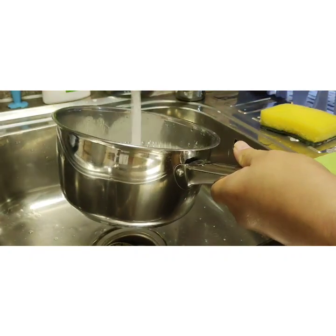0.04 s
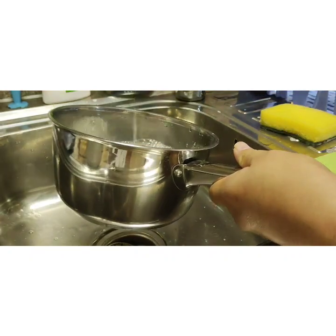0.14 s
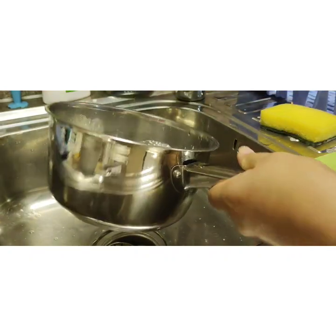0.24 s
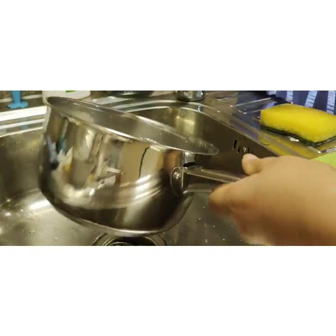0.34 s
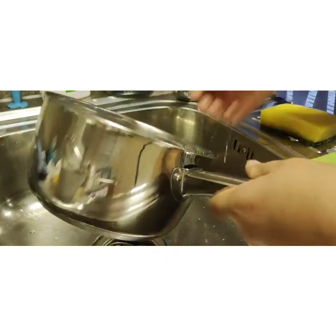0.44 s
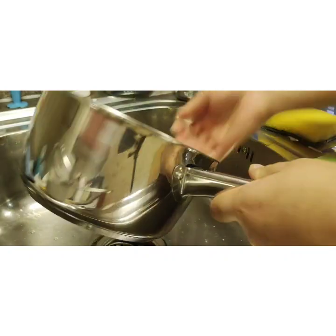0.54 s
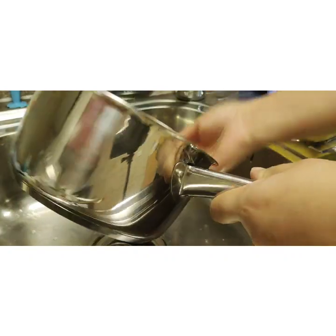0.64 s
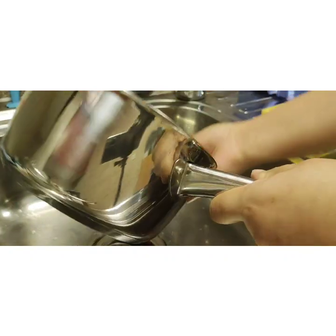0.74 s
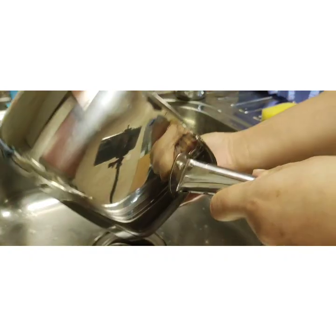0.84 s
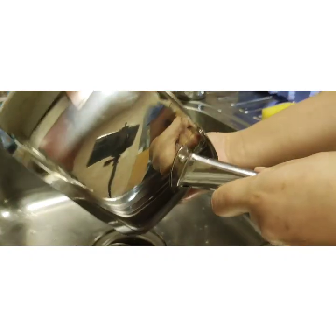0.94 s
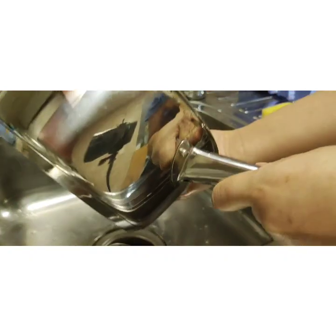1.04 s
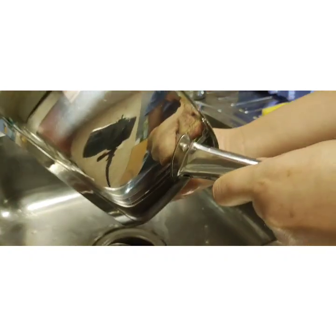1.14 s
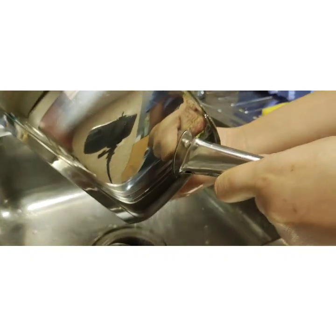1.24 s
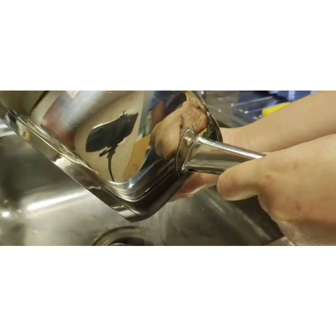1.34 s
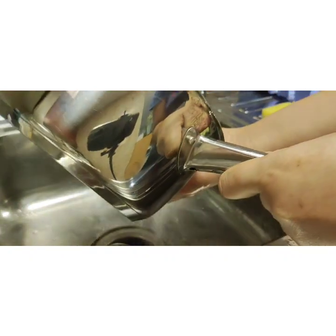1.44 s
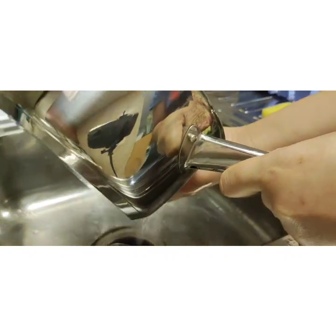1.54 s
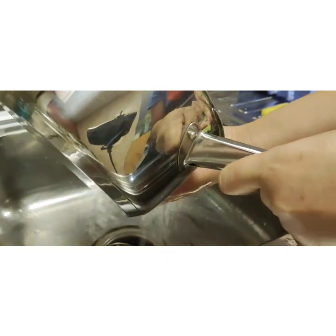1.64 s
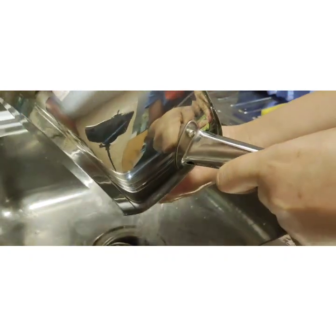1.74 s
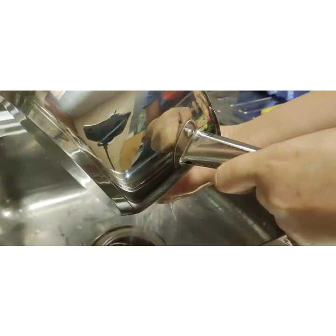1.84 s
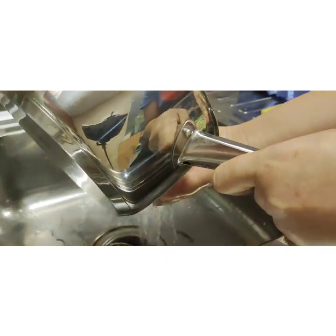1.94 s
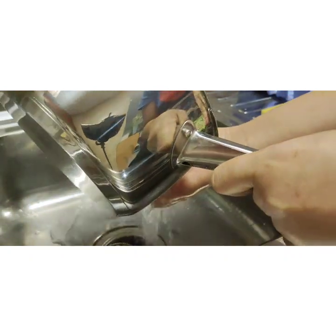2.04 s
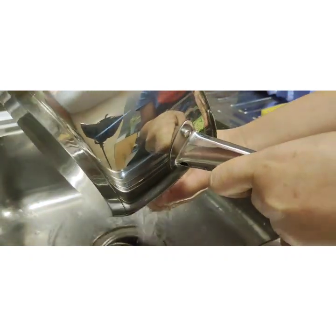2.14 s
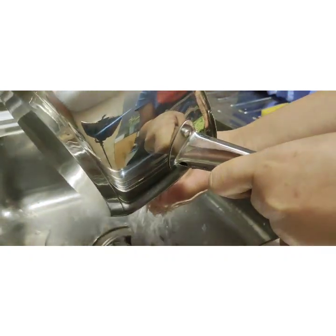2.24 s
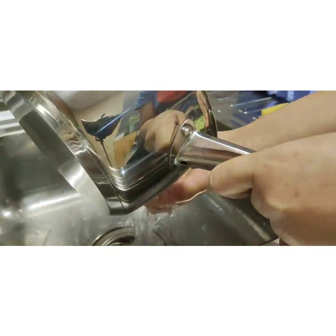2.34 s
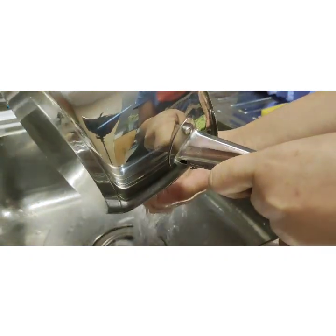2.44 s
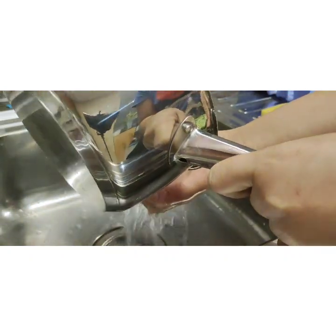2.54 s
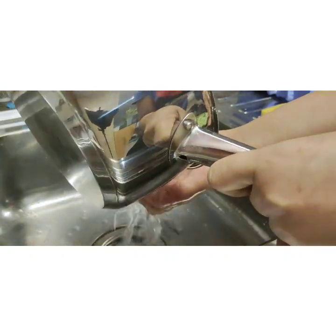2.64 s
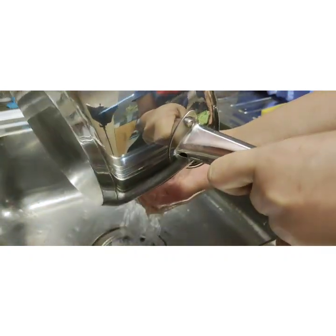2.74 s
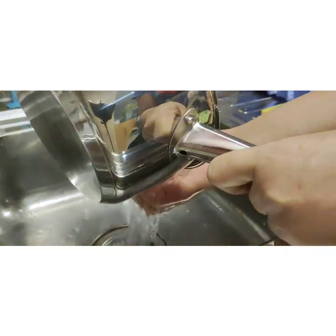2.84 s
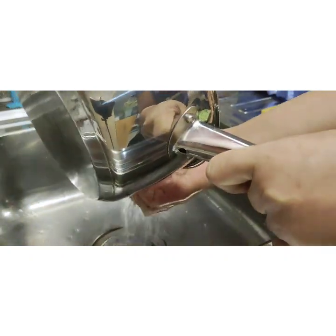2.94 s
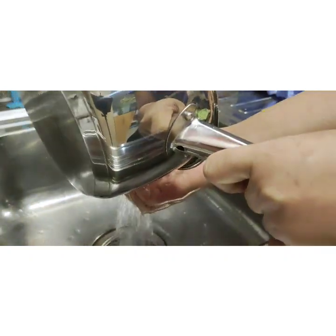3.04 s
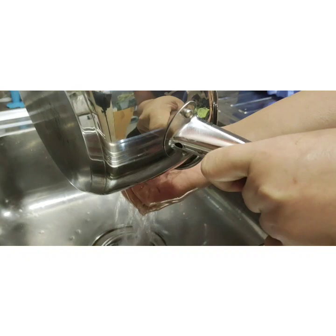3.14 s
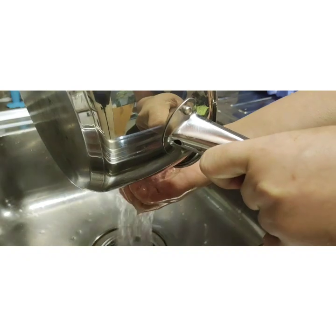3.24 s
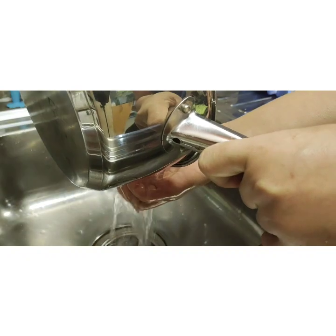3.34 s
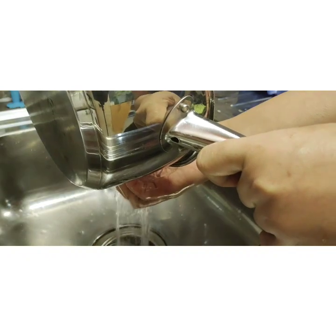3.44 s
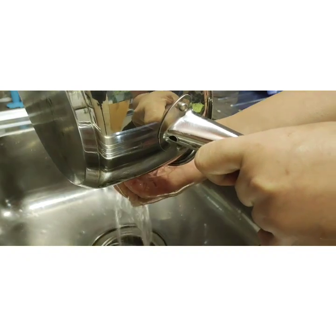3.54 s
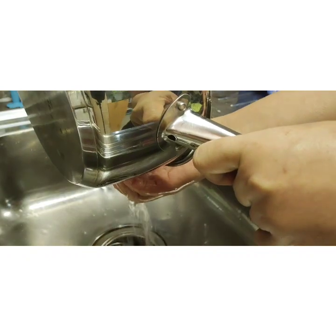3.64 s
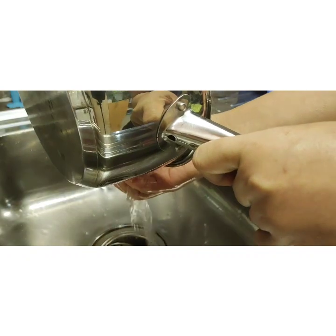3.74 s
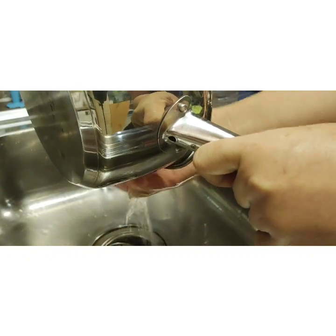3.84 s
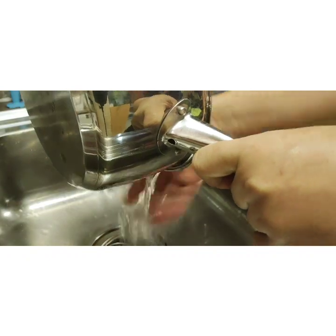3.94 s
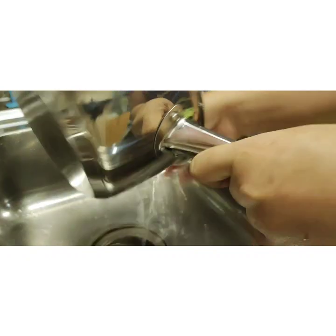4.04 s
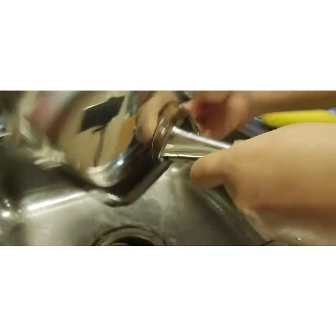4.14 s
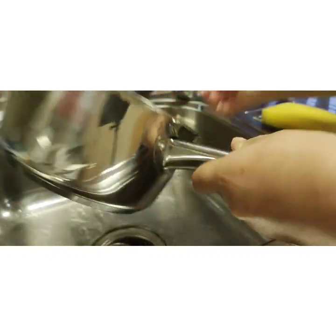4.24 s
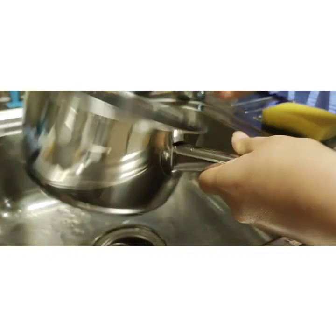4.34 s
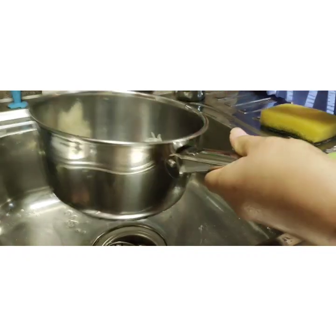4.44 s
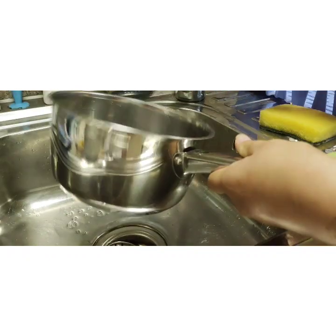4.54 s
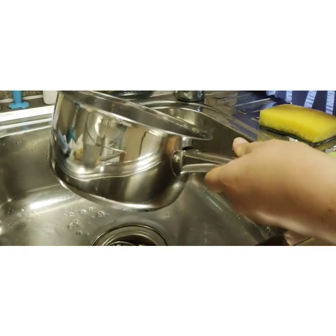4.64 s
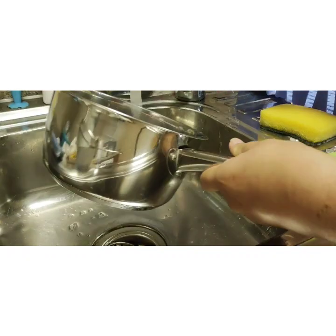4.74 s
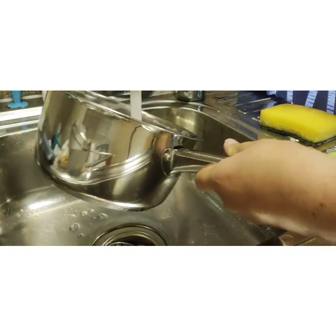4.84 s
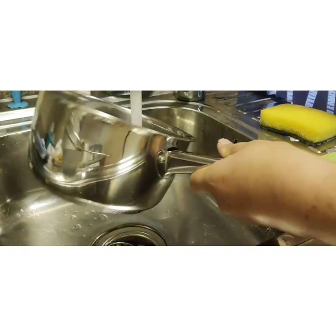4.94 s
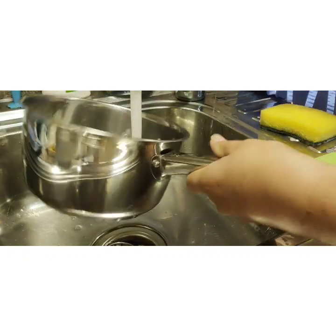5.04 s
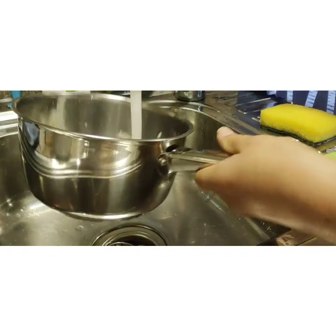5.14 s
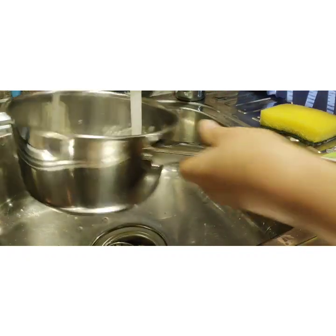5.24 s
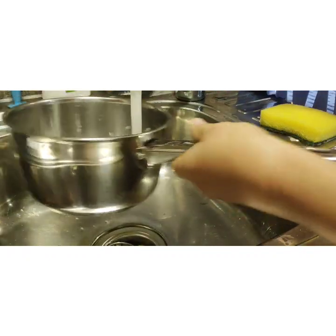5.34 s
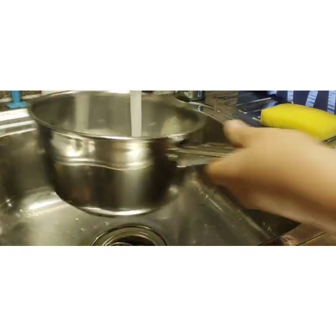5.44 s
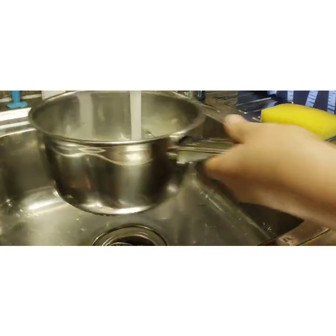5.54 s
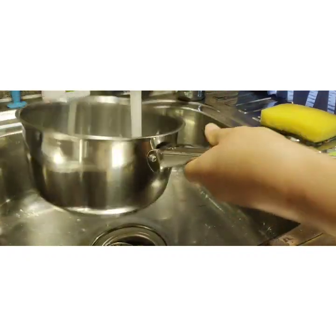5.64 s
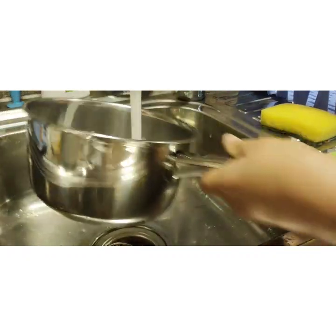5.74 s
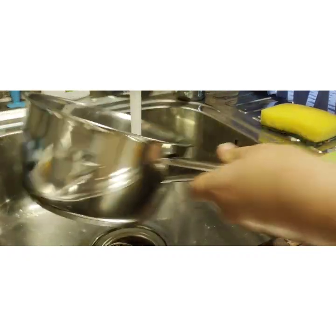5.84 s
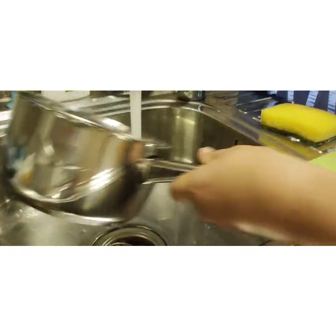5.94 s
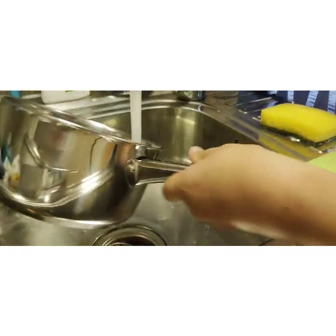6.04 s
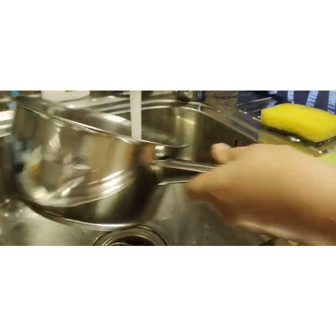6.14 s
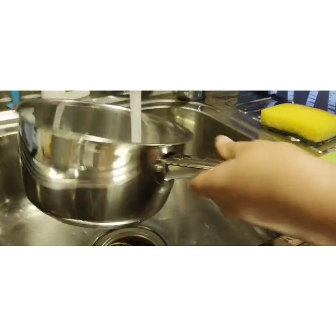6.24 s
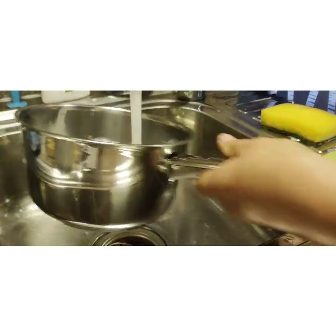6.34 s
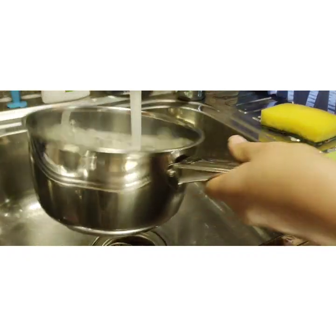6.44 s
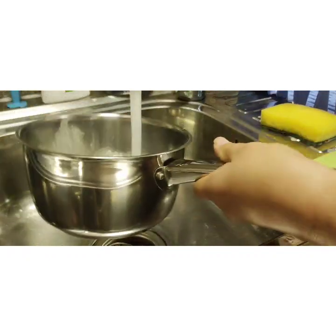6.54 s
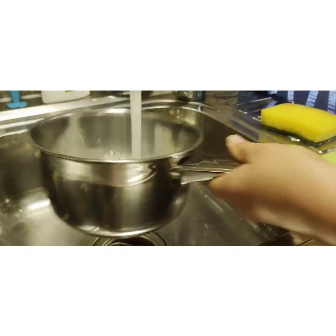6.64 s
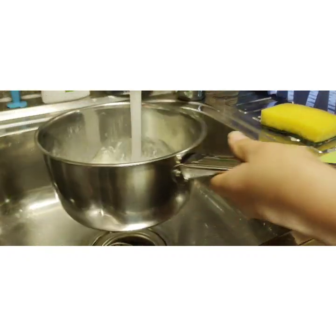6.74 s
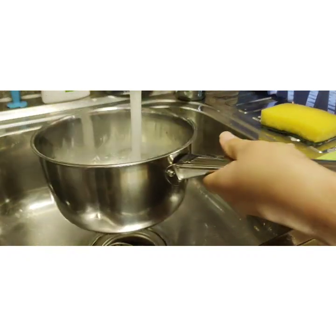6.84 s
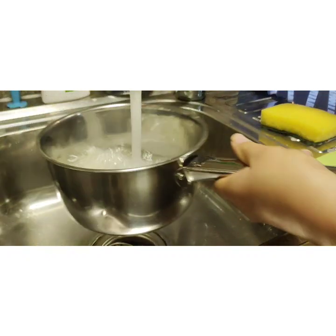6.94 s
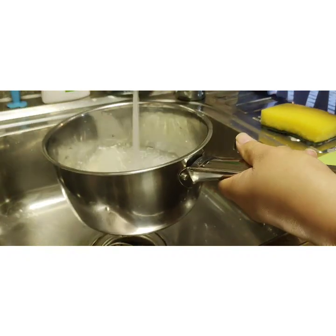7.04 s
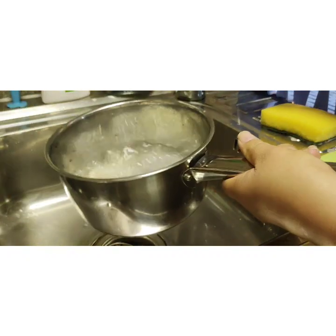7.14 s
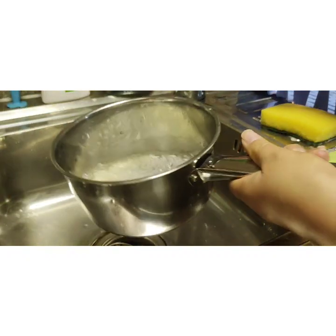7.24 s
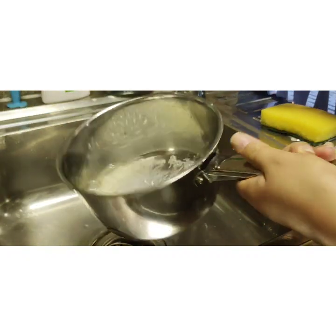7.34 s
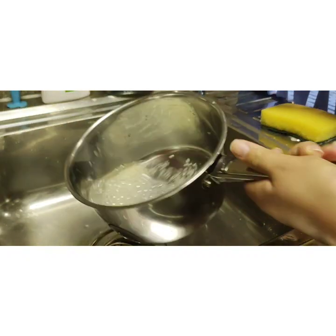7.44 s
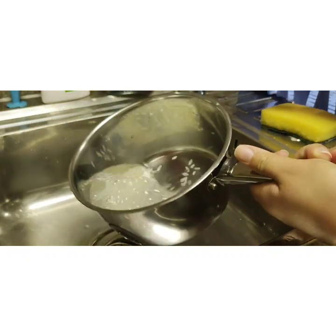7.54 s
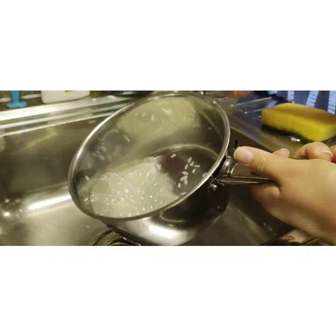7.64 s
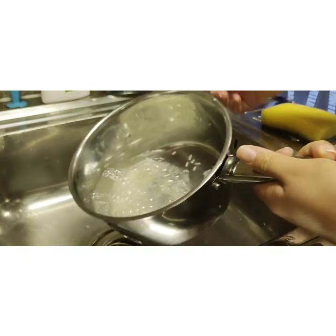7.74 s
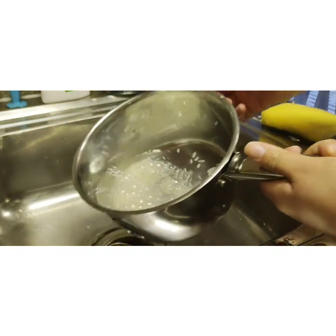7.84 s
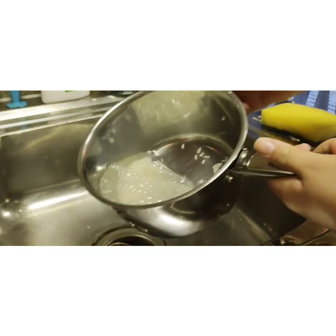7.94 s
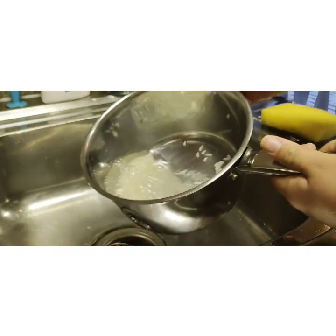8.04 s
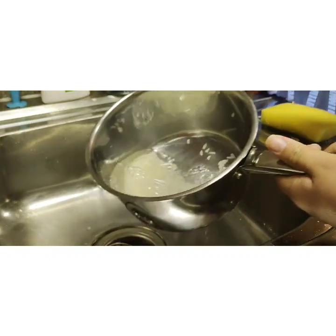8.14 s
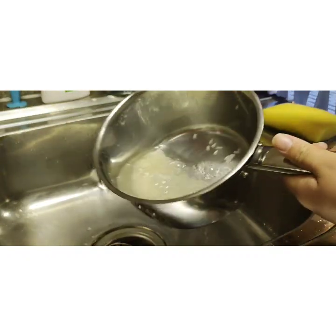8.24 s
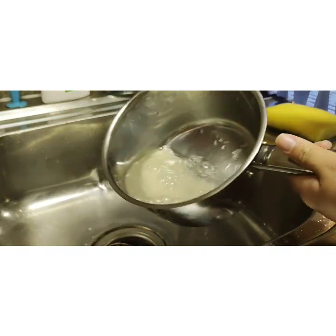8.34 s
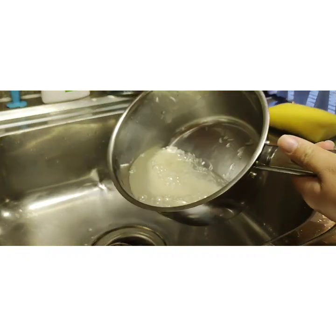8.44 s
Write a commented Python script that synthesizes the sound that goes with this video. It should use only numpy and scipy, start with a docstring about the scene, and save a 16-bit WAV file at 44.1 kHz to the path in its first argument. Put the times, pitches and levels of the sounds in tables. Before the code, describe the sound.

Water drained from a small steel pan spatters and glugs into a metal sink, followed by a short frothy tap refill.

```python
"""In a kitchen, a tap is shut over a small steel saucepan, which is then drained through a hand into a steel sink.
The pan is filled again under the aerated jet and the tap is shut once more; the room rumbles throughout.
Jet, spray, foam and rumble are coloured noise; bubbles and drips are short ringing tones; drops are noise ticks.
The shutting valve makes the sink ring. A phone with two microphone ports stands close by."""
import sys
import numpy as np
from scipy import signal
from scipy.fft import rfft, irfft, next_fast_len
from scipy.io import wavfile
from scipy.ndimage import uniform_filter1d, map_coordinates

SR = 44100
rng = np.random.default_rng(int(sys.argv[2]) if len(sys.argv) > 2 else 0)


def int16_out(signal):
    """Quantize to a 16-bit WAV file."""
    q = np.round(np.clip(np.atleast_2d(signal).T, -1, 1) * 32767)
    wavfile.write(sys.argv[1], SR, q.astype(np.int16))


N = 374391  # length in samples

# Loudness of the rumble of the room and the drumming sink: time_s, level_db
RUMBLE_LEVEL = [
    [(0.0, -59.5), (0.42, -62), (1.25, -64.5), (1.7, -55.5), (3.05, -58), (3.88, -55), (4.15, -57),
     (4.45, -63.5), (5.1, -59), (6.62, -56.5), (7.05, -59.5), (7.38, -64), (7.99, -62.5), (8.49, -63.5)],
]
# Colour of the rumble: pitch_hz, level_db (per Hz)
ROOM_COLOUR = [(13, -60), (22, -34), (75, -16), (90, -9.5), (108, 1.5), (178, -12), (238, -9), (265, -19),
               (305, -7), (345, -19.5), (443, -22), (494, -30), (600, -25), (780, -40), (1320, -120)]

# Loudness of the jet in each spell with the tap open: time_s, jet_db
TAP_OPEN = [
    [(0.0, -49), (0.126, -47), (0.172, -63.5), (0.3, -73)],
    [(4.8, -65), (4.86, -42), (4.98, -31.5), (5.06, -30), (5.35, -31), (5.51, -29), (5.62, -30.5),
     (5.76, -33.5), (6.0, -32), (6.09, -30.5), (6.25, -32.5), (6.85, -35), (6.94, -30.5), (7.074, -34),
     (7.128, -44), (7.148, -42.5), (7.22, -48.5), (7.245, -60), (7.288, -62), (7.33, -74)],
]
# Water sloshing in the swirled pan: middle_s, half_length_s, gurgle_db, churning_db
SLOSHES = [(0.137, 0.046, -50.5, -64), (0.199, 0.07, -58, -62.5), (5.024, .03, -66.5, -55),
           (5.122, .08, -53, -65), (5.234, 0.082, -47.5, -54.5), (5.436, 0.032, -53, -52),
           (5.496, .03, -75, -45), (5.785, 0.081, -53, -49.5), (5.946, 0.061, -47, -48.5),
           (6.075, 0.083, -51, -64.5), (6.285, 0.075, -50, -49), (6.354, 0.064, -54, -47.5),
           (6.43, 0.089, -50, -47), (6.634, .08, -51, -49), (6.79, 0.11, -44, -46.5),
           (6.9, 0.1, -58.5, -46.5), (6.997, 0.063, -45.5, -42.5), (7.086, 0.042, -49.5, -52),
           (7.156, 0.053, -47, -45), (7.2, 0.07, -56, -54)]
# Pitch of the air in the swirled pan: time_s, pitch_hz
PAN_AIR_PITCH = [(0.3, 740), (5.0, 500), (5.1, 620), (5.2, 660), (5.28, 732), (5.74, 734), (6.1, 675.5),
                 (6.25, 721), (6.58, 675), (6.89, 732), (7.3, 680)]
# Colour of the jet's hiss: pitch_hz, level_db (per Hz)
JET_COLOUR = [(2350, -26.5), (4000, -10.5), (4480, -18.5), (5580, -6.5), (6470, -1), (8700, 5),
              (12600, -0.5), (15200, 3), (16200, -30), (16500, -53)]
# Colour of the fine froth: pitch_hz, level_db (per Hz)
FROTH_COLOUR = [(1030, -31), (1750, -5.5), (2330, -0.5), (2620, -5), (2850, 0.5), (3410, -3), (5000, -0.5),
                (6500, -13), (11000, -120)]
# Colour of the churning water: pitch_hz, level_db
CHURN_COLOUR = [(600, -20), (880, -8), (1030, -4.5), (1220, -7.5), (1390, 3), (1500, -5), (1750, -7),
                (2200, -19.5)]
FROTH_DB, CHURN_DB, GURGLE_DB = -10, -22, -36  # each compared with the jet
DRY_S, POOL_S = 4.7, 5.0  # the pan is empty from, and holds a pool from
DRY_DB, DRY_FROTH_DB = -22, -1  # change of churning and gurgle, and of froth, while the pan is dry
FROTH_SAG_DB_PER_S = 1.5  # froth sinks as the pool deepens
SLOSH_HELD, SLOSH_EDGE_DB = 0.33, 21  # share held at full level; fall over a half length
SLOSH_FROTH_DB = -2.5  # froth thrown up, compared with the churning

# Shudder of the shutting valve: start_s, level_db, held_s
VALVE_SHUDDERS = [(0.122, -35.5, 0.11), (7.146, -43.5, 0.056)]
# Ringing tones of the sink: pitch_hz, width_hz, level_db
SINK_TONES = [(113.4, 15, 10), (294, 30, -1), (395, 140, -6.5), (515, 13, -5.5), (738, 69, -8),
              (1100, 400, -15.5)]
VALVE_RISE_DB_PER_S, VALVE_SAG_DB_PER_S, VALVE_FALL_DB_PER_S = 1302, 86, 650.5

# Foam and dribble after each wetting: start_s, fizz_db, held_s, dribble_db
FOAM = [(0.26, -69, .06, -77), (1.14, -78, .4, -81), (4.29, -72.5, .6, -71), (7.26, -66.5, .7, -69.5)]
# Colour of the fizzing foam: pitch_hz, level_db (per Hz)
FIZZ_COLOUR = [(1760, -38), (3000, -11.5), (5700, -4), (9060, -1), (12100, -9), (15100, -8), (16200, -24.5),
               (16500, -40)]
# Colour of the dribbling water: pitch_hz, level_db (per Hz)
DRIBBLE_COLOUR = [(260, -41), (450, -2.5), (958, -5.5), (1150, -8), (1300, -7), (3500, -14), (4550, -14),
                  (7700, -120)]
FOAM_RISE_S = 0.06  # time to rise by 20 dB
FIZZ_DB_PER_S, DRIBBLE_DB_PER_S, SEEP_DB = 23.5, 21.5, -80.5  # two rates of fall; steady dribble

# Steady strands of the draining water: time_s, spray_db, bubbling_db, largest_bubble_pitch_hz
POUR_STRANDS = [
    [(0.97, -83, -100, 3500), (0.982, -62.5, -80, 3500), (1.104, -75.5, -65.5, 1700),
     (1.29, -71, -68.5, 1700), (1.37, -51.5, -64, 1500), (1.48, -42, -70, 1250), (1.55, -38.5, -61.5, 1280),
     (1.62, -37.5, -50, 1370), (1.82, -40, -54.5, 1300), (1.92, -36.5, -47.5, 1236), (2.2, -36, -48, 1150),
     (2.326, -44, -51.5, 1100), (2.42, -37.5, -46.5, 1080), (2.6, -43.5, -45.5, 900),
     (2.82, -41, -47.5, 930), (3.1, -42, -51, 885), (3.4, -39, -46.5, 975), (3.67, -50.5, -51, 1050),
     (3.8, -44.5, -51.5, 1150), (3.95, -44.5, -60.5, 1230), (4.085, -55.5, -61, 1300),
     (4.17, -31, -48.5, 1210), (4.25, -48.5, -55.5, 1200), (4.31, -67.5, -69, 1100),
     (4.46, -90.5, -77, 1000), (4.62, -95, -74.5, 1000)],
]
# Gushes through the fingers: peak_s, spray_db, bubbles_db, bubble_pitch_hz
GUSHES = [(1.17, -76, -59, 1800), (1.23, -68, -59, 2200), (1.32, -56.5, -57, 1710),
          (1.37, -53, -50.5, 3500), (1.4, -46.5, -62.5, 1150), (1.415, -49.5, -58, 1700),
          (1.504, -37.5, -45, 3250), (1.6, -37.5, -45, 2600), (1.66, -46, -32, 2300),
          (1.75, -42.5, -53, 1200), (1.77, -41, -42.5, 2190), (1.988, -41.5, -42.5, 1210),
          (2.042, -35.5, -36.5, 2800), (2.09, -49, -45.5, 2600), (2.28, -40, -41.5, 3180),
          (2.36, -34, -46, 1240), (2.4, -34, -39.5, 1800), (2.444, -40, -26.5, 2470),
          (2.54, -46, -38, 1060), (2.55, -39, -37.5, 1980), (2.58, -41, -38.5, 3500),
          (2.656, -45.5, -37.5, 1050), (2.732, -33, -30, 3060), (2.83, -43, -36, 1010),
          (2.898, -32.5, -38, 3520), (3.0, -39.5, -38.5, 1150), (3.005, -43, -41, 1770),
          (3.064, -40, -47.5, 2500), (3.104, -41.5, -40.5, 1000), (3.12, -41.5, -39.5, 2600),
          (3.248, -36, -40.5, 3500), (3.312, -45, -40, 1150), (3.4, -41.5, -45, 1680),
          (3.43, -44, -42.5, 1150), (3.5, -40, -43.5, 1800), (3.592, -35, -39, 3200),
          (3.658, -61.5, -38.5, 1150), (3.77, -35, -40, 3500), (3.855, -33.5, -42, 1790),
          (3.9, -41, -43, 2800), (3.979, -49, -46, 1240), (4.005, -47, -43, 1980),
          (4.112, -38.5, -40.5, 1770), (4.122, -39, -35.5, 1190), (4.139, -27.5, -37.5, 2020)]
# Gobs of water hitting the sink: start_s, peak_db, body_db (body before its share in each bubble size)
SPLATS = [(1.4371, -27, -64), (1.4603, -23.5, -63), (1.494, -18, -35.5), (1.5703, -17, -47.5),
          (1.5927, -21, -49), (1.707, -27, -35), (1.77, -16.5, -37.5), (1.858, -16.5, -37.5),
          (1.9476, -18, -34), (1.961, -20.5, -43.5), (2.0325, -22, -39), (2.069, -16, -45),
          (2.0883, -13, -47), (2.186, -24.5, -64), (2.231, -12.5, -32.5), (2.262, -17.5, -32),
          (2.328, -36.5, -38), (2.3869, -24, -39), (2.6583, -22.5, -45), (2.6866, -23, -33.5),
          (2.733, -30, -33), (2.7615, -15.5, -34.5), (2.837, -21, -37), (2.8638, -15.5, -44.5),
          (2.9325, -20.5, -49), (2.991, -22.5, -52), (3.0513, -14, -36), (3.1073, -22.5, -40),
          (3.1748, -19, -55.5), (3.231, -16.5, -30.5), (3.303, -25, -48.5), (3.3627, -24.5, -43.5),
          (3.4355, -32, -36), (3.681, -21, -39), (3.7235, -23.5, -46), (3.7775, -8, -42), (3.845, -26, -33),
          (3.881, -12, -42.5), (3.9414, -21, -47), (4.1065, -19.5, -26.5), (4.1364, -12, -21.5)]
# Colour of the spray: pitch_hz, level_db (per Hz)
SPRAY_COLOUR = [(2530, -33), (4300, -9.5), (5450, -6.5), (6520, -2.5), (8450, 1.5), (9450, 0.5),
                (11900, -5), (15300, -12), (16200, -25), (16500, -52)]
# Band of the smallest bubbles, the beads: pitch_hz, level_db
BEAD_BAND = [(2300, -31.5), (2650, -3), (3000, -4), (4400, -3.5), (5400, -11), (6800, -30)]
# Band of the middling bubbles: pitch_hz, level_db
BUBBLE_BAND = [(1350, -22.5), (1500, -7.5), (1680, -2.5), (1970, -5.5), (2280, -4), (2450, -1), (2800, -32)]
# Band of the large bubbles, the glugs: pitch_hz, level_db
GLUG_BAND = [(900, -44.5), (1050, -10.5), (1140, 1), (1300, -3.5), (1500, -23)]
# Band of the largest bubbles, the deep glugs: pitch_hz, level_db
DEEP_BAND = [(650, -32.5), (780, -12), (890, -5), (990, -3), (1150, -46)]
# Typical pitch of beads, bubbles, glugs and deep glugs: pitch_hz
SIZE_HZ = (3540, 1830, 1200, 826)
# Level of the same four sizes compared with the bubbling: level_db
SIZE_DB = (1.5, -0.5, -3.5, 0.5)
CUT_DB_PER_OCT = 70  # bubbles larger than the strands can trap fall away
GUSH_RISE_DB_PER_S, GUSH_FALL_DB_PER_S = 293, 205
GUSH_DB_PER_OCT, GUSH_LOW_CUT = 17, 2.43  # fall away from its pitch; that much faster below it
CRACK_DB, SPLAT_DB = -9, -15  # crack and spray of a gob, compared with its peak
CRACK_T60, SPLAT_T60, BODY_T60 = .007, 0.035, 0.15  # s to fall by 60 dB

# Drops ticking on the steel: start_s, level_db (before the band filter), centre_hz, fall_by_60_db_s
DROPS = [(0.9802, -53, 6930, 0.05), (1.0236, -50, 3260, 0.05), (1.1498, -41.5, 3650, 0.091),
         (1.1837, -48, 4650, 0.05), (1.3039, -43, 6170, 0.054), (1.3295, -40, 8950, 0.05),
         (1.3736, -34, 7530, 0.046), (1.3994, -32, 7700, 0.05), (4.5294, -54.5, 2690, 0.07),
         (4.5625, -55.5, 8890, 0.05), (4.5837, -54.5, 2930, 0.099), (4.6957, -49.5, 2970, 0.069),
         (4.7441, -50.5, 2930, 0.042), (7.4973, -45, 7720, 0.14), (7.7278, -43, 11200, 0.093),
         (7.8436, -47.5, 7970, 0.046), (7.903, -45, 13550, 0.047), (8.0474, -51, 9140, 0.14)]
# Drips into standing water: start_s, peak_db, pitch_hz (at the start)
PLINKS = [(4.4727, -57.5, 1450), (4.7436, -57, 1220), (7.54, -56, 1506)]

# How alike the left and right ports hear: pitch_hz, likeness (0 to 1)
LIKENESS = [(30, 1), (100, 0.99), (260, 1), (430, 0.74), (900, 0.44), (1500, 0.18), (2500, 0.11),
            (16000, 0.062)]
# Left port compared with the right: pitch_hz, left_over_right_db
LEFT_LEAN = [(60, -7), (99, 0), (160, -0.5), (270, -0.5), (450, -1.5), (740, 1), (1220, 2.5), (2010, -0.5),
             (3330, 0.5), (5500, 2), (9080, 6), (15000, -1)]
LAG_S, TOP_HZ = .00012, 16050  # the right port hears later by this; band limit


def amp(db):
    """Turn decibels into a plain gain."""
    return 10 ** (np.asarray(db) / 20)


def unit(x):
    """Scale a sound to an average (rms) strength of one."""
    return x / np.sqrt(np.mean(x ** 2) + 1e-20)


def along(points, hz):
    """Read a (pitch, value) curve on a log pitch axis."""
    f, v = np.transpose(points)
    return np.interp(np.log(hz + 1), np.log(f + 1), v)


def gains(spells):
    """One gain per sample for each column after the time; silent outside the spells."""
    t = np.arange(N) / SR
    total = 0
    for s, *columns in map(np.transpose, spells):
        total = total + amp([np.interp(t, s, column, -200, -200) for column in columns])
    return total


def wobble(rate):
    """A smooth random curve with this many random points a second."""
    knots = rng.standard_normal(int(N * rate / SR) + 4)
    return map_coordinates(knots, [np.arange(N) * rate / SR])


def swells(s, db, rise, fall, held=0):
    """Summed gains that rise to db at time s, hold, then fall, with slopes in dB a second."""
    t = np.arange(0, N / SR + .002, .001)[:, None]
    power = amp(db - rise * np.maximum(s - t, 0) - fall * np.maximum(t - s - held, 0)) ** 2
    return np.interp(np.arange(N) / SR, t[:, 0], np.sqrt(power.sum(axis=1)))


def filtered(x, response):
    """Reshape a sound with a gain for each pitch."""
    m = next_fast_len(N + SR // 8, True)
    gain = np.asarray(response(np.fft.rfftfreq(m, 1 / SR)), np.complex64)
    return irfft(rfft(x.astype(np.float32), m) * gain, m)[..., :N]


def noise(spectrum, patchy_db):
    """Two unrelated coloured noises that share random louder and softer patches in time and pitch."""
    re, im = rng.standard_normal((2, 2, 129, N // 128 + 2), np.float32)
    field = rng.standard_normal(re.shape[1:])
    field = uniform_filter1d(uniform_filter1d(field, size=8, axis=0), size=8, axis=1)
    patches = (re + 1j * im) * amp(patchy_db * unit(field))
    pair = signal.istft(patches, window="cosine", nperseg=256)[1][:, :N]
    return unit(filtered(pair, lambda hz: amp(along(spectrum, hz))))


def spatter(rate, spread_db, t60, bed):
    """Gain curve of random impacts: sudden rises that die away over a steady bed."""
    strength = amp(spread_db * np.minimum(rng.exponential(size=N), 3.5))
    hits = (rng.random(N) < rate / SR) * strength
    return unit(bed + signal.lfilter([1], [1, -amp(-60 / (t60 * SR))], hits))


def scattered(x, t60):
    """The sound itself, and an unrelated copy that has rattled round the sink."""
    t = np.arange(SR // 20) / SR
    tail = rng.standard_normal(len(t)) * amp(-60 * t / t60)
    return np.array([x, signal.oaconvolve(x, tail / np.linalg.norm(tail))[:N]])


def bubbles(count, hz, spread, cycles, spread_db, rise):
    """Bubbles: softly starting, dying tones whose pitch rises."""
    when, tone, size = rng.random((count, 3)).T[:, :, None]
    pitch = hz * np.exp(spread * (2 * tone - 1))
    t = np.arange(int(2.2 * cycles / hz * SR)) / SR
    life = t * pitch / cycles
    strength = amp(spread_db * np.minimum(-np.log(1 - size), 2.8))
    fade = life * np.exp(-3 * life)
    ring = strength * fade * np.sin(2 * np.pi * pitch * t * (1 + rise * life))
    index = (when * N).astype(int) + np.arange(len(t))
    mixed = np.bincount(index.ravel(), ring.ravel(), N)[:N]
    return unit(scattered(mixed, t60=0.1))


def wet(spectrum, patchy_db, share, **grain):
    """Bubbles blended into noise, both kept to one band."""
    ringing = unit(filtered(bubbles(**grain), lambda hz: amp(along(spectrum, hz))))
    return unit(noise(spectrum, patchy_db) + share * ringing)


def drumming():
    """The room and the drumming sink rumble: low noise with a wavering level."""
    return gains(RUMBLE_LEVEL)[0] * amp(1.2 * wobble(9)) * noise(ROOM_COLOUR, patchy_db=1.0)


def pan_air():
    """Air in the swirled pan gurgles: a narrow band of noise whose pitch glides and wavers."""
    t = np.arange(N) / SR
    pitch = np.interp(t, *np.transpose(PAN_AIR_PITCH)) * (1 + 0.032 * wobble(25))
    narrow = [(1, 11.5), (55, -0.5), (150, -14.5), (500, -28.5), (3000, -91.5)]  # offset_hz, level_db
    re, im = noise(narrow, patchy_db=1.0)
    carrier = np.exp(2j * np.pi * np.cumsum(pitch) / SR)
    return scattered(((re + 1j * im) * carrier).real, t60=0.22)


def tap():
    """The aerated jet hisses, froths and churns the water, and sets the air in the pan gurgling."""
    jet, t = gains(TAP_OPEN)[0], np.arange(N) / SR
    dry_pan = (t > DRY_S) & (t < POOL_S)
    pool = jet * amp(DRY_DB * dry_pan)
    filling_s = np.where(t > POOL_S, t - POOL_S, 2)  # before the pool: as if filled for 2 s
    foaming = jet * amp(FROTH_DB + DRY_FROTH_DB * dry_pan - FROTH_SAG_DB_PER_S * filling_s)

    s, half, gurgle_db, churn_db = np.transpose(SLOSHES)
    edge, held = SLOSH_EDGE_DB / half, SLOSH_HELD * half
    slosh = swells(s - held, churn_db, edge, edge, 2 * held)
    slosh_gurgle = swells(s - held, gurgle_db, edge, edge, 2 * held)
    froth = np.hypot(foaming, amp(SLOSH_FROTH_DB) * slosh)
    churn = np.hypot(amp(CHURN_DB) * pool, slosh)
    gurgle = np.hypot(amp(GURGLE_DB) * pool, slosh_gurgle)

    patter = spatter(rate=1900, spread_db=-0.5, t60=0.0029, bed=6.5)
    hiss = noise(JET_COLOUR, patchy_db=1.08) * patter * amp(0.8 * wobble(15))
    fine = wet(FROTH_COLOUR, 2.0, share=0.44, count=2000, hz=2883, spread=0.498,
               cycles=32.0, spread_db=2.5, rise=0.046)
    coarse = wet(CHURN_COLOUR, 2.2, share=0.6, count=1000, hz=1230, spread=0.338,
                 cycles=12.8, spread_db=-1.0, rise=0.069)
    return jet * unit(hiss) + froth * fine + churn * coarse + gurgle * pan_air()


def modes(table):
    """Filter made of a few ringing tones with alternating signs."""
    def response(f):
        total = 0
        for k, (c, w, db) in enumerate(table):
            total = total + (-1) ** k * amp(db) * 1j * f * w / (c * c - f * f + 1j * f * w)
        return total
    return response


def valve():
    """The shutting valve shakes the pipe: the sink rings unsteadily over a rattle, without deep bass."""
    t = np.arange(N) / SR
    ring = 0
    for hz, width, db in SINK_TONES:
        level = amp(db + 1.9 * wobble(width))
        ring = ring + level * np.sin(2 * np.pi * hz * t + 1.4 * wobble(width))
    rattle = filtered(rng.standard_normal(N), modes(SINK_TONES))
    s, db, held = np.transpose(VALVE_SHUDDERS)
    shudder = swells(s, db, VALVE_RISE_DB_PER_S, VALVE_FALL_DB_PER_S, held)
    since_start = (t - np.where(t < s.mean(), *s)).clip(0, 1)  # from the nearer of the two shudders
    shudder = shudder * amp(-VALVE_SAG_DB_PER_S * since_start)
    boom = shudder * unit(unit(ring) + 0.72 * unit(rattle))
    # the basin gives off no deep bass
    return scattered(filtered(boom, lambda hz: (1j * hz / (60 + 1j * hz)) ** 2), t60=.03)


def foam():
    """Foam fizzes as crackling noise, and water dribbles off as lower noise."""
    s, fizz_db, held, dribble_db = np.transpose(FOAM)
    fizz = swells(s, fizz_db, 20 / FOAM_RISE_S, FIZZ_DB_PER_S, held)
    dribble = amp(SEEP_DB) + swells(s, dribble_db, 20 / FOAM_RISE_S, DRIBBLE_DB_PER_S, held / 2)
    crackle = spatter(rate=300, spread_db=3.5, t60=.006, bed=2.3)
    out = fizz * noise(FIZZ_COLOUR, patchy_db=1.0) * crackle
    return out + dribble * noise(DRIBBLE_COLOUR, patchy_db=1.5)


def strands():
    """Gains of the spray and of each size of bubble: the steady strands plus the gushes."""
    spray, bubbling, _ = gains(POUR_STRANDS)
    s, *_, hz = np.transpose(POUR_STRANDS[0])
    largest = np.interp(np.arange(N) / SR, s, np.log2(hz))  # pitch in octaves
    s, spray_db, bubbles_db, hz = np.transpose(GUSHES)
    sizes = []
    for band, level in zip(SIZE_HZ, SIZE_DB):
        too_large = np.maximum(largest - np.log2(band), 0)
        steady = bubbling * amp(level - CUT_DB_PER_OCT * too_large)
        away = abs(np.log2(hz / band)) * np.where(hz > band, GUSH_LOW_CUT, 1)
        gush = swells(s, bubbles_db - GUSH_DB_PER_OCT * away, GUSH_RISE_DB_PER_S, GUSH_FALL_DB_PER_S)
        sizes.append(np.hypot(steady, gush))
    spray_gush = swells(s, spray_db, GUSH_RISE_DB_PER_S, GUSH_FALL_DB_PER_S)
    return np.hypot(spray, spray_gush), *sizes


def bursts(times, levels, t60, attack):
    """Gain curve of splashes that start at the given times (s) with the given levels (dB)."""
    out, t = np.zeros(N + SR), np.arange(SR // 5) / SR
    for s, db in zip(times, levels):
        out[round(s * SR):][:len(t)] += amp(db - 60 * t / t60) * (1 - np.exp(-t / attack))
    return out[:N]


def pour():
    """Water breaks up on the fingers and spatters on the sink; thicker strands trap larger, deeper bubbles."""
    spray, beads, bubble, glug, deep = strands()
    lumps = spatter(rate=73, spread_db=3.0, t60=0.043, bed=2.1)
    gobs = spatter(rate=45, spread_db=0.5, t60=0.068, bed=1.1)
    fine = spatter(rate=810, spread_db=1.5, t60=0.0012, bed=2.25)

    s, db, body_db = np.transpose(SPLATS)
    cracks = bursts(s, db + CRACK_DB, CRACK_T60, attack=0.00097)
    splashes = bursts(s, db + SPLAT_DB, SPLAT_T60, attack=0.00065)
    body = bursts(s, body_db, BODY_T60, attack=0.0025)

    wash = (spray * unit(lumps * fine) + splashes + cracks) * noise(SPRAY_COLOUR, patchy_db=2.5)
    wash += (beads * gobs + 0.26 * body) * wet(
        BEAD_BAND, 0.7, share=1.0, count=1500, hz=3483, spread=0.413, cycles=30, spread_db=5.5, rise=.04)
    wash += (bubble * gobs ** 0.69 + 0.2 * body) * wet(
        BUBBLE_BAND, 2.6, share=0.98, count=1100, hz=1904, spread=0.344, cycles=14.7, spread_db=2.0, rise=0.04)
    wash += glug * gobs ** .4 * wet(
        GLUG_BAND, 4.5, share=1.01, count=700, hz=1127, spread=0.1, cycles=10.5, spread_db=3.5, rise=0.018)
    wash += deep * gobs ** .4 * wet(
        DEEP_BAND, 1.6, share=1.1, count=700, hz=887, spread=.12, cycles=6.1, spread_db=4.0, rise=0.051)
    return wash + 0.11 * wash[::-1]  # the drain lies a little nearer the left port


def drops():
    """Single drops tick on the steel: short bursts of noise, each kept to a band."""
    out, t = np.zeros((2, N)), np.arange(SR // 8) / SR
    for s, db, hz, t60 in DROPS:
        tick = amp(db - 60 * t / t60) * rng.standard_normal((2, len(t)))
        band = signal.butter(2, [0.8 * hz, 1.28 * hz], "bandpass", fs=SR, output="sos")
        out[:, round(s * SR):][:, :len(t)] += signal.sosfilt(band, tick)
    return out


def plinks():
    """A drip into standing water leaves one ringing bubble whose pitch rises."""
    out, t = np.zeros(N), np.arange(SR // 10) / SR
    for s, db, hz in PLINKS:
        fade = amp(db - 60 * t / 0.078) * (1 - np.exp(-t / .002))
        out[round(s * SR):][:len(t)] += fade * np.sin(2 * np.pi * hz * t * (1 + 1.7 * t))
    return scattered(out, t60=0.045)


def scene():
    """Add up all sources: one part common to both ports, one that sets them apart."""
    return drumming() + tap() + valve() + foam() + pour() + drops() + plinks()


def record(dry):
    """The ports hear the bass alike and the treble mostly unrelated, each with its own colour, up to a limit."""
    side = np.array([[1], [-1]])  # left, right

    def apart(hz):
        return np.tan(np.arccos(np.clip(along(LIKENESS, hz), 0, 1)) / 2)

    def port(hz):
        colour = amp(side * along(LEFT_LEAN, hz) / 2)
        delay = np.exp(1j * np.pi * side * hz * LAG_S)
        return colour * delay * (hz < TOP_HZ)

    return filtered(dry[0] + side * filtered(dry[1], apart), port)


dry = scene()
out = record(dry)
int16_out(out)
```